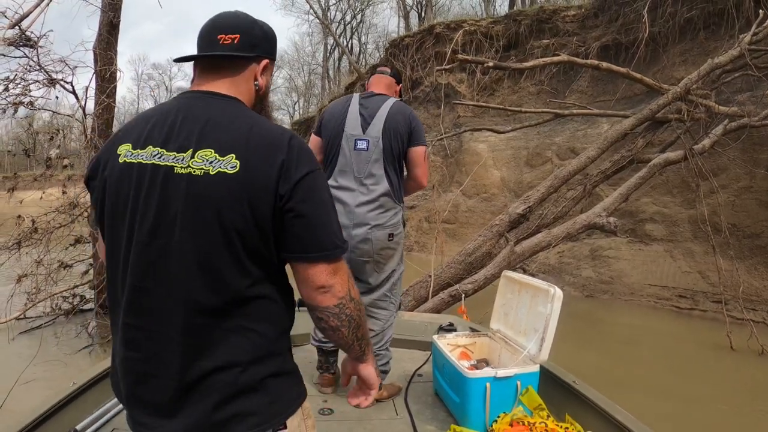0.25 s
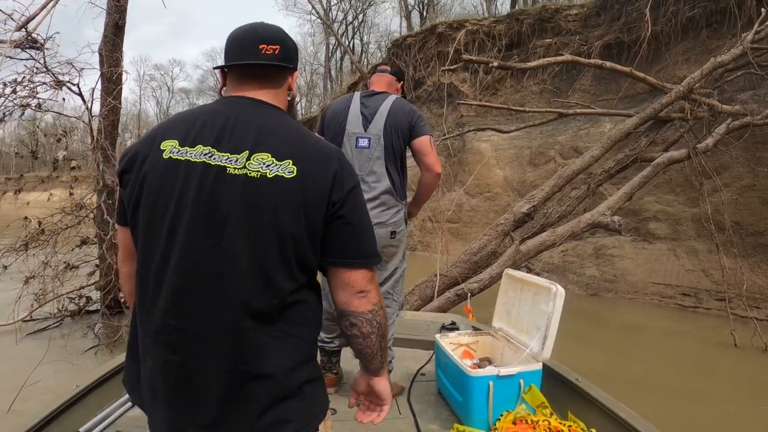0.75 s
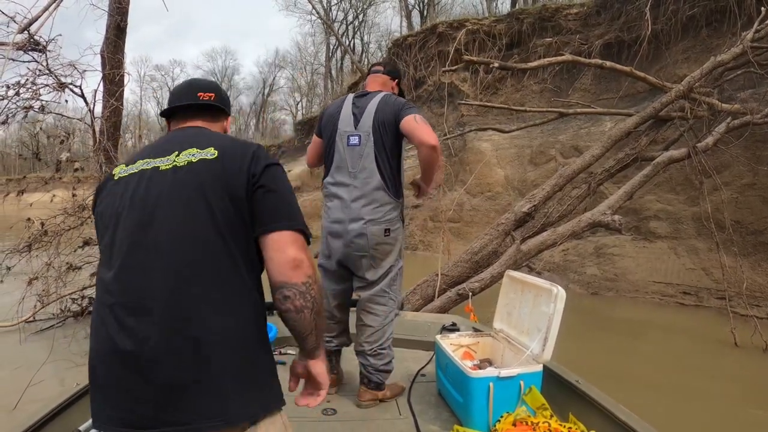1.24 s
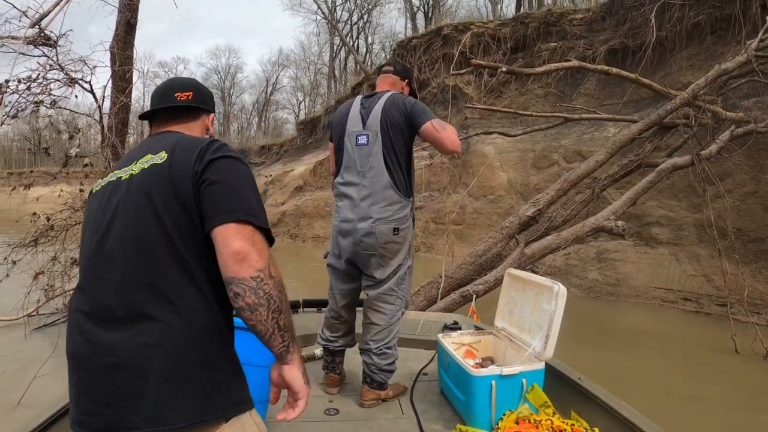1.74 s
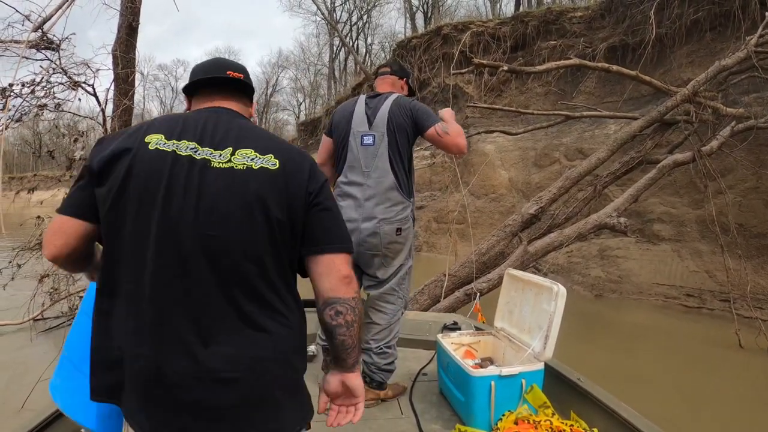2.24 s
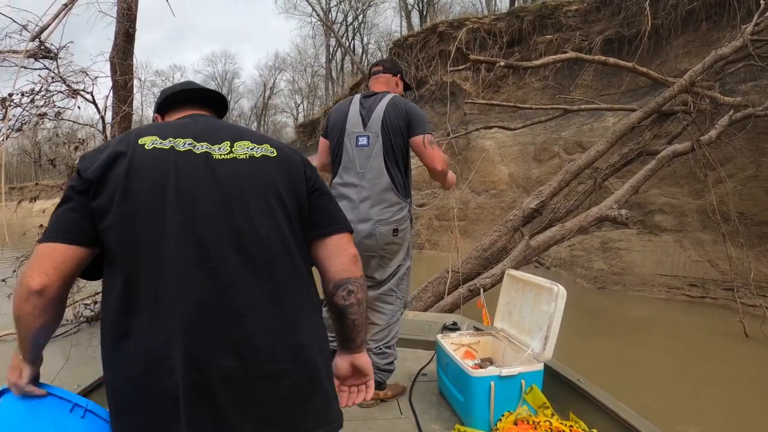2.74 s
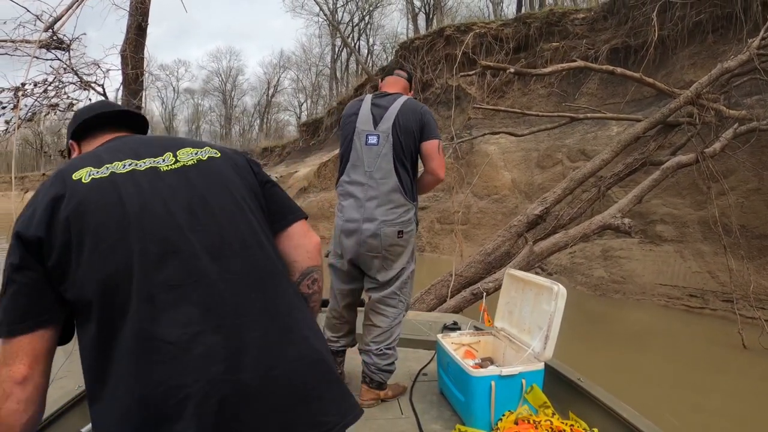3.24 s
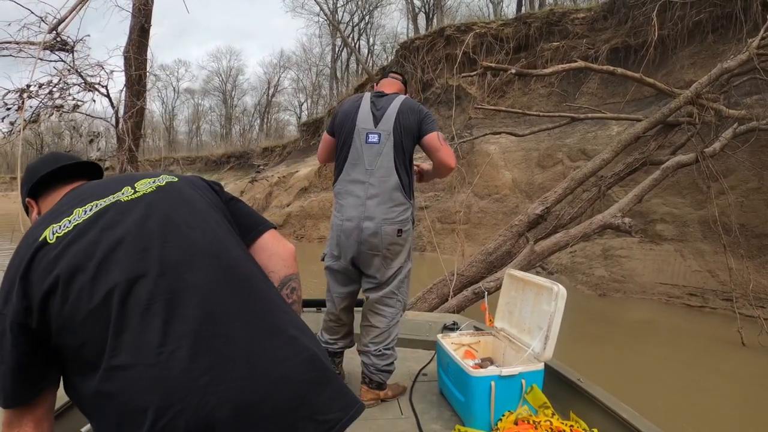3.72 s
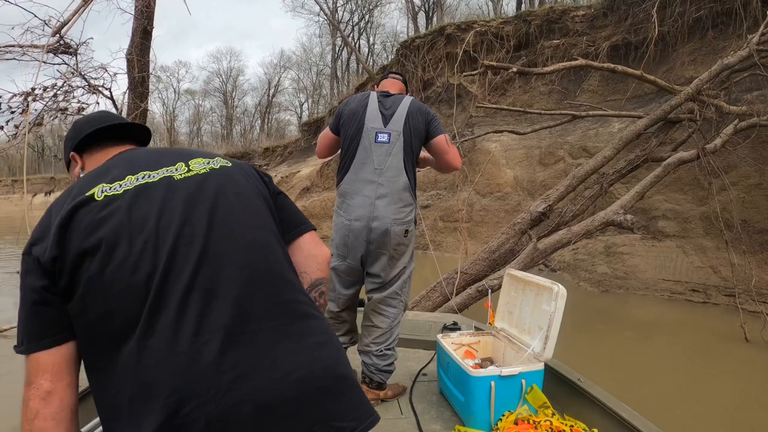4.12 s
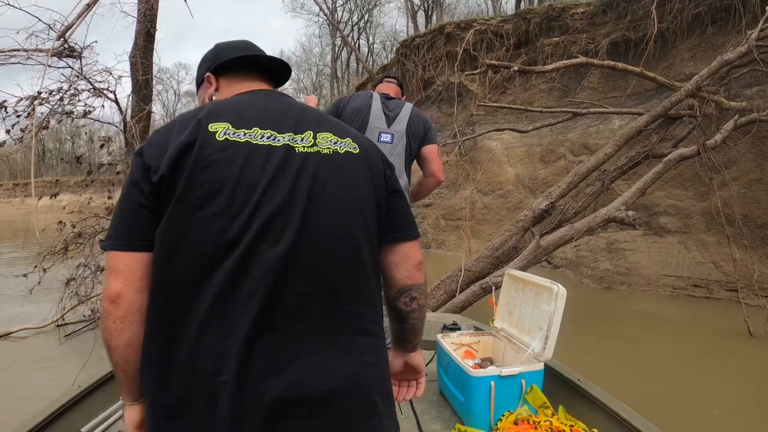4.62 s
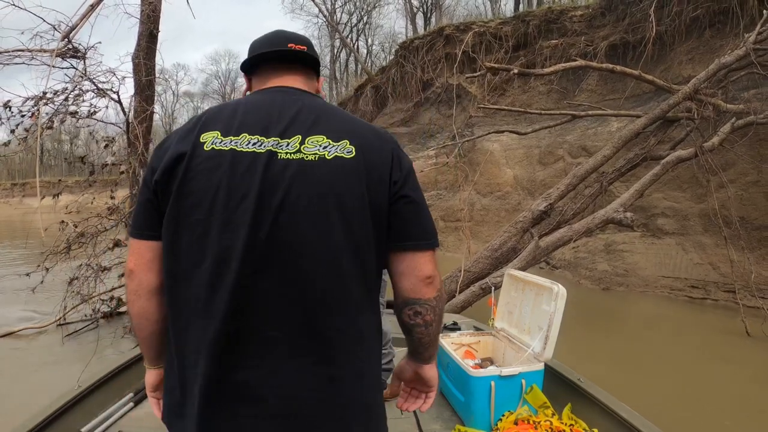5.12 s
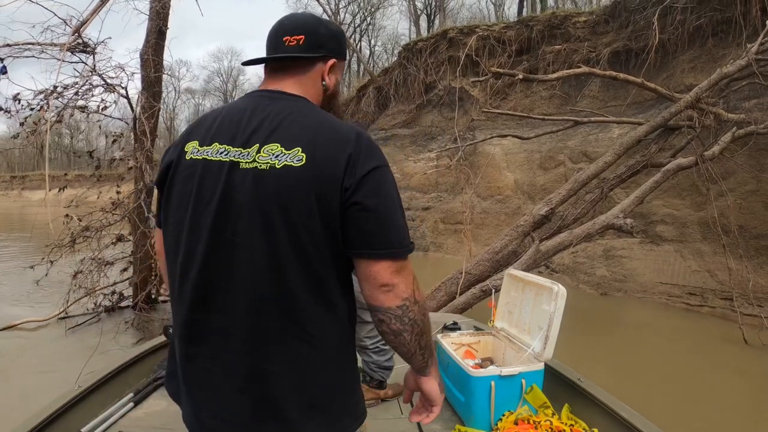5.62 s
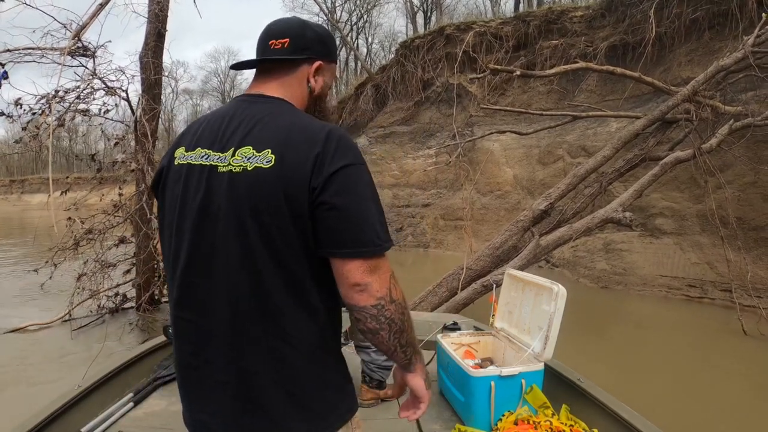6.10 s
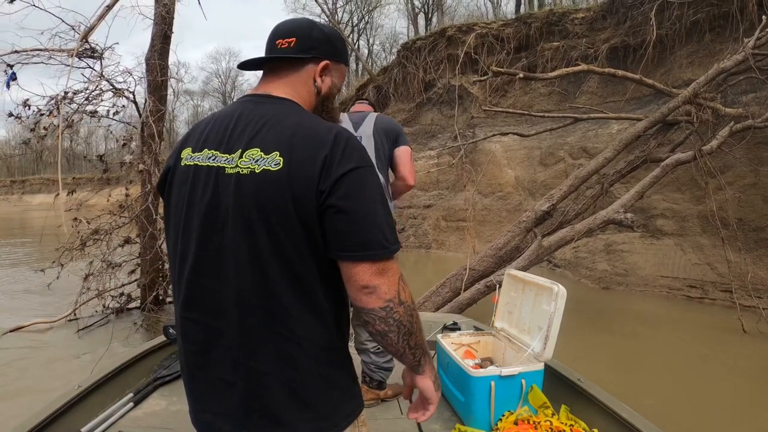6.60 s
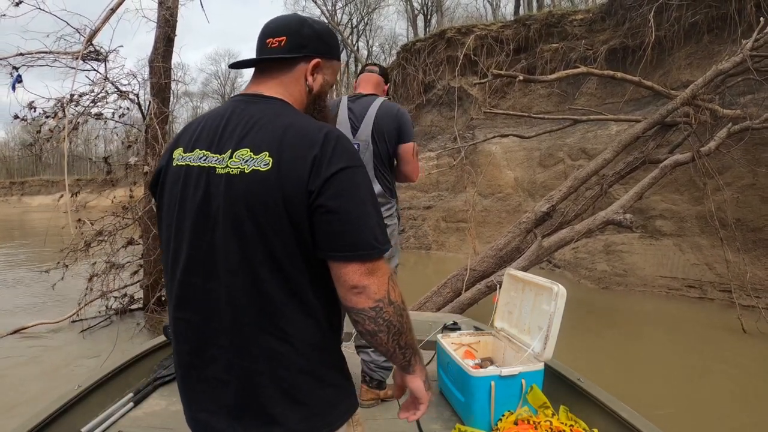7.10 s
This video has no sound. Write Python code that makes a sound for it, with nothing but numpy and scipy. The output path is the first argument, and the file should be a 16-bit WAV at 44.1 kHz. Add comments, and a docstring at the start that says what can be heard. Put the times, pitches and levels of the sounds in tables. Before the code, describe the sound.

Close, busy clattering and booming thumps on a small metal boat, with gritty dragging and one short rasp, then quiet lapping and soft rumble.

```python
"""Thuds and hard clacks: boots and an empty plastic drum on a small aluminium boat, close to the microphone.
Heavy contacts are decaying sines and noise for deck, hollow and hull; hard edges are short noise bursts
with a ring; dragging is patchy noise and humming hull modes, and the drum's rim rasps once.
Behind them lie low rumble, far rushing and hiss (coloured noise), lapping (rising sine blips), wind on
the microphone ports and, once all stands still, a faint rustle."""
import sys
import numpy as np
from scipy import signal
from scipy.fft import rfft, irfft, next_fast_len
from scipy.io import wavfile
from scipy.ndimage import uniform_filter1d, map_coordinates

SR = 44100
rng = np.random.default_rng(int(sys.argv[2]) if len(sys.argv) > 2 else 0)


def generate_wav(signal):
    """Clip the signal to [-1, 1] and save it as 16-bit WAV at the path in sys.argv[1]."""
    frames = np.transpose(np.atleast_2d(signal))
    scaled = np.clip(frames, -1, 1) * 32767
    pcm = np.round(scaled).astype(np.int16)
    wavfile.write(sys.argv[1], SR, pcm)


N = 324135

# hull modes: f/Hz, relative level/dB, free decay t60/s
HULL = [(160.43, 0.5, 0.25), (352, -13.5, 0.18), (416.7, -7, 0.12), (476.1, -9, 0.17), (566.2, -11, 0.15),
        (682.4, -16.5, 0.12), (778, -23.5, 0.21), (970, -15, 0.085)]
# left-right likeness of far sound: f/Hz, likeness
ALIKE_AIR = [(60, 1), (150, 1), (370, 0.94), (910, 0.62), (2240, 0.19), (5500, 0.42), (9000, .2),
             (13000, .4)]
# left-right likeness of sound close by: f/Hz, likeness
ALIKE_NEAR = [(60, 0.88), (150, 1), (370, 0.95), (910, 0.98), (2240, 0.97), (5500, 0.66), (9000, 0.1),
              (13000, 0.36)]


def amp(db):
    """dB to gain."""
    return 10 ** (np.asarray(db) / 20)


def unit(x):
    """Scaled to rms 1."""
    return x / np.sqrt(np.mean(x ** 2) + 1e-20)


def along(points, hz):
    """Values of (Hz, value) points, joined on a log frequency axis."""
    f, v = np.transpose(points)
    return np.interp(np.log(hz + 1), np.log(f + 1), v)


def bump(hz, centre, half_width, top_db):
    """A resonance hump in dB, half as high one half-width (Hz) off its centre."""
    return top_db / (1 + ((hz - centre) / half_width) ** 2)


def curves(rows):
    """One value per sample for each column after the time."""
    s, *cols = np.transpose(rows)
    return [np.interp(np.arange(N) / SR, s, c) for c in cols]


def wobble(rate):
    """A smooth random curve over the whole scene, rate knots a second."""
    knots = rng.standard_normal(int(N * rate / SR) + 4)
    return map_coordinates(knots, [np.arange(N) * rate / SR])


def jagged(t, rate):
    """Random knots joined by straight lines over the times t, rate knots a second."""
    knots = rng.standard_normal(int(t[-1] * rate) + 2)
    return np.interp(t * rate, np.arange(len(knots)), knots)


def filtered(x, response):
    """x passed through a complex response of frequency."""
    n = x.shape[-1]
    m = next_fast_len(n + 2048)
    return irfft(rfft(x, m) * response(np.fft.rfftfreq(m, 1 / SR)), m)[..., :n]


def stereo(pair, colour_db, alike):
    """Two unrelated noises turned into a coloured left-right pair of rms 1."""
    def mid_side(hz):
        angle = np.arccos(np.clip(along(alike, hz), -1, 1)) / 2
        return amp(colour_db(hz)) * [np.cos(angle), np.sin(angle)]

    mid, side = filtered(pair, mid_side)
    return unit(np.array([mid + side, mid - side]))


def patchy(patchy_db):
    """Two noises whose gain varies in shared random patches of time and frequency."""
    z = signal.stft(rng.standard_normal((2, N)), nperseg=512)[2]
    field = uniform_filter1d(rng.standard_normal(z.shape[1:]), 5, 0)
    field = uniform_filter1d(field, 10, 1)
    return signal.istft(z * amp(patchy_db * unit(field)), nperseg=512)[1][:, :N]


def place(out, start_s, sound):
    """Adds a short sound to out at its start time."""
    out[:, round(start_s * SR):][:, :sound.shape[-1]] += sound


def far_air():
    """Low rumble and the far band of rushing: noise with slightly wavering level."""
    # colour: f/Hz, relative density/dB
    air = [(24, -53), (40, -1.5), (77, -1), (173, -16), (197, -12.5), (243, -15), (305, -17), (339, -26),
           (474, -24.5), (549, -29), (800, -37.5), (1000, -29), (1300, -27), (1500, -29.5), (1700, -36),
           (2010, -36.5), (3000, -41.5), (3500, -48), (5990, -54.5), (7790, -83.5), (13200, -120)]
    calm = amp(.3 * wobble(1) + .4 * wobble(8)) * patchy(patchy_db=1.5)
    return amp(-36.5) * stereo(calm, lambda hz: along(air, hz), ALIKE_AIR)


def steady_hiss():
    """A very faint, steady treble noise."""
    # colour: f/Hz, relative density/dB
    hiss = [(4000, -18), (6000, -13.5), (8000, -14), (11000, -23), (13000, -27), (15500, -46.5)]
    return amp(-75.5) * stereo(rng.standard_normal((2, N)), lambda hz: along(hiss, hz), ALIKE_AIR)


def wind():
    """Wind lumps on the microphone ports: low noise that swells and sinks."""
    # buffeting: t/s, level/dB
    strength = [(0, -30.5), (1, -36.5), (2.05, -40), (2.5, -31), (3.4, -30), (3.9, -46), (5.1, -36.5),
                (6.1, -41.5), (6.3, -45.5), (7.35, -40.5)]
    # colour: f/Hz, relative density/dB
    gust = [(10, -39.5), (25, 10), (50, 8), (100, 5.5), (300, -13.5), (1000, -77)]
    buffet = stereo(rng.standard_normal((2, N)), lambda hz: along(gust, hz), [(30, .95)])
    return amp(curves(strength)[0] + 1.5 * wobble(7)) * buffet


def rustle():
    """Faint flickering noise once all stands still."""
    # rustle: t/s, mean level/dB
    stir = [(6.1, -74), (6.34, -75), (6.9, -60), (7, -71), (7.35, -83)]
    colour = [(1200, -29.0), (2500, -4.0), (5500, -15), (8000, -42.5)]  # f/Hz, relative density/dB
    stir_db = curves([(stir[0][0] - .1, -99), *stir])[0] + 3 * wobble(35)
    return amp(stir_db) * stereo(patchy(patchy_db=1.5), lambda hz: along(colour, hz), ALIKE_AIR)


def lapping():
    """Water laps at the hull: short bubbles with rising pitch, scattered left and right."""
    # single drips and gurgles: t/s, starting f/Hz, level/dB, cycles to the peak
    plips = [(5.073, 4300, -48, 2.5), (5.09, 1900, -48, 5), (5.215, 1320, -44, 7.3),
             (5.365, 2980, -49, 2.8), (5.47, 2420, -43, 3.3), (5.7, 3450, -49, 2.5),
             (5.732, 5000, -52, 2.5), (6.385, 4400, -51, 2.5), (5.53, 1470, -48, 11),
             (5.675, 1020, -44, 5.3), (5.77, 1390, -44, 6.3), (5.827, 2900, -44, 2.7), (5.87, 1750, -45, 9),
             (6.57, 840, -48, 3.5), (6.585, 1270, -44, 5), (6.74, 1260, -47, 14), (6.885, 940, -46, 6.3),
             (7.095, 604, -44, 2.2), (7.155, 633, -44, 2), (7.33, 850, -41.5, 4.4)]
    out, t = np.zeros((2, N + SR)), np.arange(SR // 16) / SR
    bubbles_per_s, median_hz, spread = 30, 1250, .18
    when, size, pitch = rng.random((round(bubbles_per_s * N / SR), 3)).T
    small_hz = median_hz * np.exp(spread * np.log(pitch / (1 - pitch)) / 2)
    small_db = -61 - 3 * np.log(size + .1)  # few are loud
    small = np.transpose([when * N / SR, small_hz, small_db, np.full(len(when), 5)])
    for s, hz, db, cycles in [*plips, *small]:
        turns, side = hz * t, rng.uniform(.25, .75)
        swell = turns / cycles * np.exp(1 - turns / cycles)
        plip = swell * np.sin(2 * np.pi * turns * (1 + .0015 * turns))
        place(out, s, amp(db) * np.sqrt([[2 * side], [2 - 2 * side]]) * plip)
    return out[:, :N]


def bank(x):
    """Answer of deck and river bank: a noise tail in which each frequency dies at its own speed."""
    # decay: f/Hz, t60/s
    decay = [(200, 0.098), (1500, 0.12), (8000, 0.058)]
    hz, t, z = signal.stft(rng.standard_normal((2, SR // 2)), SR, nperseg=256)
    fade = amp(-60 * t / along(decay, hz)[:, None])
    tail = signal.istft(z * fade, SR, nperseg=256)[1]
    return signal.fftconvolve(x, tail / np.linalg.norm(tail[0]), axes=1)[:, :N]


def hull_hum():
    """The shifting load drives the hull: uneven noise rings its damped modes."""
    # drive: t/s, hum level/dB
    roll = [(0, -24), (.18, -34.5), (.56, -40), (.85, -25.5), (1.25, -39.5), (1.5, -65), (1.76, -30),
            (1.92, -52), (2.32, -27.5), (2.8, -42), (3.15, -41.5), (3.53, -29), (3.85, -29.5),
            (4.05, -28.5), (4.45, -44.5)]
    # broad low modes that only a dragged load drives: f/Hz, relative level/dB, t60/s
    low_modes = [(72, 6.5, 0.078), (230, -1.5, 0.06), (309.2, 1, 0.094)]

    def hull(f):
        total = 0
        for k, (centre, db, t60) in enumerate([*low_modes, *HULL]):
            damping = 1j * f * (3 / t60)
            total = total + (-1) ** k * amp(db) * damping / (centre * centre - f * f + damping)
        return total / (1 + (f / 1200) ** 4)  # rubber and plastic push the plate only slowly

    push = amp(11.3 * np.tanh(wobble(24.85))) * rng.standard_normal(N)
    gain = amp(curves([*roll, (roll[-1][0] + .15, -99)])[0])
    return gain * unit(filtered(push, hull))


def drag():
    """Grit rubs and sizzles under a sliding load, cloth swishes and the hull hums."""
    # dragging: t/s, mean rub level/dB, mean swish level/dB
    slide = [(0, -37, -58), (.16, -55, -74), (.35, -51, -66.5), (.64, -48, -79), (.86, -54, -71),
             (1.02, -38.5, -73), (1.32, -65, -80), (1.63, -87, -84), (2.09, -45.5, -75.5),
             (2.37, -45.5, -67), (2.6, -59, -76), (2.77, -40, -67.5), (3, -58.5, -77), (3.2, -48.5, -69),
             (3.63, -44, -64), (4.14, -41, -69.5), (4.2, -58.5, -82.5), (4.55, -47.5, -66.5),
             (4.78, -42, -60), (5, -47.5, -69), (5.2, -63, -89), (5.59, -50, -77), (5.9, -60.5, -79)]
    # rub of grit: f/Hz, relative density/dB
    rub_colour = [(290, -12.5), (500, 2), (829, -4), (1030, -5), (1200, -2), (1550, -15), (1650, -6.5),
                  (4500, -18), (5850, -31), (9900, -120)]
    # sizzle of grit: f/Hz, relative density/dB
    sizzle_colour = [(2500, -13), (4000, -9.5), (5500, -5.5), (7000, -8), (9000, -40), (12000, -80.5)]
    # swish of cloth: f/Hz, relative density/dB
    swish_colour = [(5000, -23), (7500, -6.5), (10000, -12.5), (13000, -15), (15500, -49)]
    t = np.arange(N) / SR
    moving = np.clip((slide[-1][0] + 0.089 - t) / 0.053, 0, 1)  # everything comes to rest
    rub_gain, treble_gain = moving * amp(curves(slide) + 1.04 * wobble(9.4))  # the load slides in jerks
    grit = amp(wobble(40) + 2.5 * wobble(400)) * patchy(patchy_db=2)
    rub = stereo(grit, lambda hz: along(rub_colour, hz), ALIKE_NEAR)
    sizzle = stereo(grit, lambda hz: along(sizzle_colour, hz), ALIKE_NEAR)
    swish = stereo(patchy(patchy_db=0.5), lambda hz: along(swish_colour, hz), ALIKE_NEAR)
    treble = amp(6) * sizzle + swish  # sizzle 6 dB over the cloth
    return rub_gain * rub + treble_gain * treble + hull_hum()


def rasp():
    """The drum's rim judders once over the deck; its colour and its ring shift along the stroke."""
    # scrape at the start of the stroke: f/Hz, relative density/dB
    start_colour = [(290, -38), (500, -11), (940, -5), (1250, -8), (2300, -8.5), (6000, -23.5), (8000, -34),
                    (13000, -47), (15500, -77)]
    # scrape at its end: f/Hz, relative density/dB
    end_colour = [(290, -38), (500, -4), (1170, -9), (1550, -6), (2400, -8), (6000, -22), (8000, -37.5),
                  (13000, -39), (15500, -82)]
    # ring of the rim: t/s into the stroke, f/Hz
    ring_pitch = [(0, 940), (.04, 953), (.06, 1600), (.1, 1240)]
    start_s, lasts_s, rise_s, fall_s = 2.552, 0.08, 0.012, 0.06
    t = np.arange(SR // 4) / SR
    stroke = np.clip(np.minimum(t / rise_s, 1 + (lasts_s - t) / fall_s), 0, 1) ** 2
    done = np.clip(t / lasts_s, 0, 1)
    first = stereo(rng.standard_normal((2, len(t))), lambda hz: along(start_colour, hz), ALIKE_NEAR)
    last = stereo(rng.standard_normal((2, len(t))), lambda hz: along(end_colour, hz), ALIKE_NEAR)
    scrape = np.sqrt(1 - done) * first + np.sqrt(done) * last
    waver = unit(filtered(rng.standard_normal(len(t)), lambda hz: 1 / (1 + (hz / 130) ** 2)))
    turns = np.cumsum(np.interp(t, *np.transpose(ring_pitch))) / SR
    ring = np.sqrt(2) * waver * np.sin(2 * np.pi * turns)
    slips = amp(2.5 * jagged(t, rate=300))  # stick-slip grain
    level = amp(-33.5 + 4.5 * done)  # swells along the stroke
    out = np.zeros((2, N))
    place(out, start_s, stroke * slips * level * (scrape + amp(-3.5) * ring))
    return out


def edge_noise(n, edge_hz, sizzle_db):
    """Grit under a hard edge: noise standing out at the edge's pitch and at ribs that ring through it."""
    # colour of a clack: f/Hz, relative density/dB
    edge_colour = [(1000, -16.5), (1700, 4.5), (2800, 2.5), (4800, 0.5), (7000, -11.5), (10000, -20.5),
                   (13000, -31.5), (15500, -47)]
    # ribs: mean f/Hz, half-width/Hz
    ribs = [(1250, 70), (1720, 90), (2250, 100), (2650, 110), (3290, 130), (3900, 150), (4500, 170),
            (5200, 190), (6200, 220)]
    scatter = rng.uniform([-1, 0], 1, (len(ribs), 2))

    def colour_db(hz):
        db = along(edge_colour, hz) + along([(4500, 0.005), (6000, sizzle_db)], hz)
        db = db + bump(hz, edge_hz, 0.2 * edge_hz, 6.1)
        # a small, high edge radiates little far below its pitch
        db = db + along([(.3 * edge_hz, -9), (.55 * edge_hz, 0)], hz)
        for (centre, width), (shift, share) in zip(ribs, scatter):
            db = db + bump(hz, centre * (1 + .03 * shift), width, 9 * share)  # a rib adds at most 9 dB
        return db

    return stereo(rng.standard_normal((2, n)), colour_db, ALIKE_NEAR)


def plate_knock(t, knock_hz, sharpness):
    """The plate under the edge: dull noise around its pitch; a sharp blow rings the panel clearly."""
    # colour of the knock: f/Hz, relative density/dB
    knock_colour = [(150, -35.5), (350, -2), (900, -1.5), (1500, -3.5), (2500, -44.5), (5000, -74.5)]
    colour_db = lambda hz: along(knock_colour, hz) + bump(hz, knock_hz, 0.2 * knock_hz, 6.2)
    dull = stereo(rng.standard_normal((2, len(t))), colour_db, ALIKE_NEAR)
    return dull + amp(-2) * sharpness * np.sin(2 * np.pi * knock_hz * t)


def clacks():
    """A crack of grit with a short ring of the edge, over a duller, longer knock of the plate."""
    # hard edges; a quick rise clacks, a slow one scuffs: t/s, level/dB, knock re usual/dB, knock f/Hz,
    # sizzle re the usual treble/dB, crack t60/s, rise/s, edge f/Hz
    edges = [(.004, -34, 9.5, 666, -9, 0.053, 0.004, 2230),
             (0.0691, -25, -3, 670, -11, 0.04, 0.00088, 2240),
             (0.096, -25.5, -8, 650, 2.5, 0.11, 0.0026, 2490), (.118, -31, 1, 885, -6, 0.04, .003, 2220),
             (0.1425, -20, -4.5, 1000, -34, 0.044, 0.002, 2230),
             (.196, -37, -16, 616, 6, 0.59, 0.0051, 4270), (0.237, -30, -8, 634, -6, 0.067, 0.0023, 3750),
             (0.2674, -23, -10, 1027, 0.5, 0.1, 0.0015, 2560),
             (0.3027, -27.5, -11, 587, 4, 0.15, 0.0024, 2290),
             (0.344, -28.5, -12, 633, -32, 0.072, 0.00044, 1770),
             (0.4341, -32.5, -11, 1340, -6, 0.12, 0.002, 2080),
             (0.541, -29, -3, 746, -4, 0.083, 0.00031, 4350),
             (0.6553, -38.5, -2.5, 990, -5, 0.38, 0.00066, 2010),
             (.6799, -33, -3, 608, 1, 0.25, 0.00063, 1760), (0.71, -18.5, -10, 638, 3, 0.11, 0.0078, 3130),
             (.752, -42, -22, 595, -18, .056, .0007, 2460),
             (0.781, -30.5, -24, 1060, 7, 0.13, 0.0035, 2980),
             (0.817, -13.5, -2.5, 916, -4.5, 0.072, 0.00074, 2400),
             (.873, -36.5, -20, 900, -7, 0.061, .006, 4260),
             (.9234, -19, -8, 596, 6.5, 0.061, 0.00063, 3670),
             (0.9625, -26.5, -11, 623, 3, 0.078, 0.0013, 3820),
             (.982, -37, -17, 910, 12, 0.044, .003, 4870),
             (.9976, -13.5, 3.5, 401, -6, 0.074, 0.00099, 2100),
             (1.068, -27, -4, 697, 1, 0.089, 0.007, 4130),
             (1.1491, -33.5, 9, 574, -26, 0.053, 0.0004, 1760),
             (1.1863, -23.5, -5.5, 666, -3, 0.054, 0.016, 2700),
             (1.275, -28, -21, 704, 1.5, 0.05, 0.0013, 5420), (1.315, -37, 4, 604, -1, 0.23, 0.0027, 5130),
             (1.3503, -31, -7, 603, 7, 0.088, 0.0021, 4100),
             (1.4845, -29.5, -4.5, 986, -1, 0.048, 0.0005, 4160),
             (1.596, -27.5, 8.5, 420, -9, 0.085, 0.00049, 1910),
             (1.6544, -28, -17, 896, -4.5, 0.058, 0.00055, 2590),
             (1.696, -43.5, -13, 900, -6, 0.091, .001, 3670),
             (1.7722, -29.5, 8.5, 1061, -0.5, 0.066, 0.00035, 2120),
             (1.815, -42, -6, 900, 0, 0.039, .001, 3600),
             (1.8257, -36.5, 9.5, 960, -20, 0.083, 0.00062, 2010),
             (1.9, -32.5, -19, 1030, 2, 0.037, 0.00049, 4100),
             (1.931, -39, -24, 900, -1, 0.044, .001, 4090), (1.979, -47, -22, 903, 2, 0.076, 0.0028, 5200),
             (2.0866, -32.5, -26, 990, 2, 0.054, 0.0023, 2070),
             (2.1133, -26.5, -26, 1020, 0, 0.082, 0.0013, 4170),
             (2.1596, -29, 1.5, 1224, -6, 0.038, .0012, 4660),
             (2.203, -23, -3, 720, -5, 0.054, 0.026, 1910),
             (2.2689, -25.5, -8.5, 1140, -1, 0.16, .0007, 1910),
             (2.2819, -15, -29, 605, 2, 0.061, 0.0072, 2490),
             (2.37, -25.5, 4.5, 1108, 2.5, 0.093, 0.00031, 1586),
             (2.414, -35, 4, 603, 3, 0.082, 0.0045, 1670), (2.466, -32, -1, 904, 3, 0.077, 0.00069, 1960),
             (2.6561, -34.5, 12.5, 660, -8, 0.056, .0006, 2660),
             (2.707, -19.5, -4, 710, -1, 0.13, 0.0046, 4050),
             (2.732, -28, -10, 900, -15, 0.029, 0.0013, 2170),
             (2.8146, -32.5, 3, 600, 4, 0.057, 0.0032, 2600),
             (2.9033, -36.5, 3.5, 890, -28, 0.07, .0008, 1840),
             (2.928, -32, 2.5, 1284, -1, 0.046, 0.00055, 4700),
             (3.108, -41.5, 10, 880, 3, 0.12, 0.0057, 3850), (3.1346, -29, 2, 1006, 0, 0.19, 0.0096, 1700),
             (3.1626, -19, -5.5, 757, 0.5, 0.056, 0.0069, 3960),
             (3.2328, -38, -13, 1130, 4, 0.18, 0.00077, 1670),
             (3.27, -37, -21, 605, 23, 0.035, 0.00086, 3170),
             (3.2995, -33.5, 10.5, 1010, -32, 0.05, 0.00052, 2030),
             (3.325, -32.5, 0, 910, -15, .08, 0.0078, 2550),
             (3.4024, -36, 6.5, 605, -10, 0.15, .0008, 1740), (3.4294, -28, 0, 624, 3, 0.074, 0.0044, 2310),
             (3.466, -35, -16, 910, 0, 0.11, 0.0059, 3600), (3.494, -17.5, 2, 560, -7, 0.065, 0.0003, 2190),
             (3.5394, -31.5, 17, 624, -18, 0.061, 0.0022, 2230),
             (3.61, -41.5, 17, 710, -18, 0.16, 0.013, 1710),
             (3.6549, -27.5, 7.5, 663, -1.5, 0.33, 0.00087, 2440),
             (3.679, -14, -0.5, 590, -4.5, 0.063, 0.00047, 1970),
             (3.716, -46, 11, 650, -25, 0.021, .001, 1700), (3.77, -21.5, 7, 735, -32, 0.064, 0.006, 2210),
             (3.788, -39.5, 15, 904, -25, 0.23, 0.0035, 1710),
             (3.875, -37.5, 12, 810, -22, 0.21, .02, 1700),
             (3.921, -28, 5.5, 445, -18, 0.034, 0.0013, 1940),
             (4.087, -25.5, 4.5, 870, 2, 0.081, 0.021, 2680),
             (4.187, -38.5, 20.5, 1054, -30, 0.045, 0.00028, 1260),
             (4.494, -28.5, 4, 744, 7, 0.042, 0.0038, 2900), (4.502, -25, 4.5, 765, -8, 0.057, 0.0087, 740),
             (4.609, -38, 8, 618, -20, 0.12, 0.0082, 2140), (4.75, -34, 1, 1290, -10, 0.13, 0.0064, 1970),
             (4.7755, -22, 12.5, 1650, -30, 0.018, 0.0015, 1180),
             (4.791, -30, 1, 1310, -8, 0.046, 0.0024, 1600), (4.842, -32, 10, 970, -12, 0.019, 0.001, 3640),
             (5.5579, -27.5, -6, 980, -1.5, 0.1, 0.00031, 2230),
             (5.591, -32.5, -4, 950, -2, 0.063, 0.0037, 2690),
             (5.628, -36.5, -2, 986, -10, 0.053, 0.0011, 2500),
             (5.933, -17.5, 3.5, 590, -9, 0.071, 0.00032, 2350),
             (5.9538, -31, 3, 1015, -3, 0.17, 0.00058, 1730)]
    # the gear is carried to the left: t/s, left re right/dB
    leftward = [(0, 0), (2, 0.5), (3.5, 1), (4.7, 1), (5.9, 0.5)]
    out, t = np.zeros((2, N + SR)), np.arange(SR // 6) / SR
    for s, db, knock_db, knock_hz, sizzle_db, t60, rise, edge_hz in edges:
        t60 = max(t60, .01)
        # the gain makes up for decay during a slow rise
        start = amp(40 * rise / t60) * (1 - np.exp(-(t / max(rise, 1e-4)) ** 2))
        # a slow rise leaves the plate damped, so the knock dies with the scuff
        sharpness = np.exp(-rise / 0.017)
        # sharp first contact, then rattle
        crack = (amp(-60 * t / t60) + 0.2 * amp(-60 * t / 0.0033)) * edge_noise(len(t), edge_hz, sizzle_db)
        ring = amp(-12 - 60 * t / min(0.045, 2.7 * t60)) * np.sin(2 * np.pi * edge_hz * t)
        knock_gain = amp(-8.5 + knock_db - 60 * t / ((1 + 1.21 * sharpness) * t60))
        knock = knock_gain * plate_knock(t, knock_hz, sharpness)
        rattle = amp(1.5 * jagged(t, rate=222.5))
        place(out, s, amp(db) * start * rattle * (amp(-5.5) * crack + ring + knock))
    return out[:, :N] * amp(curves(leftward)[0] * np.array([[.5], [-.5]]))


def deck_boom(t, level_db, hz):
    """The deck flexes under the weight and keeps swinging faintly afterwards."""
    swell_s = 0.013  # time the deck takes to flex fully
    flex = (t / swell_s * np.exp(1 - t / swell_s)) ** 1.5
    tail = amp(-14.5 - 60 * t) * (1 - np.exp(-t / swell_s))
    return amp(level_db) * (flex + tail) * np.sin(2 * np.pi * hz * t)


def hull_ring(t, low_db, high_db, share):
    """The hull modes ring at new strengths and pitches; upper modes come in beating pairs."""
    hz, level_db, t60 = np.transpose([HULL[0]] + 2 * list(HULL[1:]))[:, :, None]
    upper = hz > 190
    size, pitch, phase = rng.standard_normal((3, len(hz), 1))
    detuned_hz = hz * (1 + np.where(upper, .015, .008) * pitch)
    swing = np.sin(2 * np.pi * detuned_hz * t + 2 * upper * phase)
    mode_db = np.where(upper, high_db, low_db) + level_db + 2 * size
    return (amp(mode_db - 60 * t / (t60 * share)) * swing).sum(0)


def thumps():
    """Each heavy contact flexes the deck, thuds in a hollow and rings the hull and its dense modes."""
    # heavy contacts: t/s, deck boom level/dB, boom f/Hz, lowest mode level/dB, hollow thud level/dB,
    # thud f/Hz, upper modes level/dB, ring length/free decay times
    contacts = [(.002, -21, 49, -30, -20, 221, -26, 0.76), (.149, -31, 55, -25.5, -28, 207, -27.5, 1.7),
                (0.27, -31.5, 95, -29.5, -28.5, 190, -37, 2.1),
                (0.347, -31, 76.6, -45, -24, 287.6, -25.5, 1.2),
                (.681, -10, 87.7, -13, -13.5, 202, -23.5, 1.4),
                (.817, -10.5, 87.2, -15.5, -13, 221, -17.5, 0.97),
                (0.859, -15, 98.5, -26, -28, 262, -34, 0.86), (0.926, -10.5, 73.5, -24, -40, 230, -36, 1),
                (1.002, -7, 88.7, -20.5, -18.5, 231, -13.5, 1.4),
                (1.074, -8.5, 73.2, -24.5, -37, 232, -24.5, 1.9),
                (1.152, -10.5, 74.6, -33, -23, 235, -26.5, 1.67),
                (1.208, -28, 86.4, -41, -23, 230, -30, 0.78),
                (1.315, -14.5, 75.7, -19, -25, 212.6, -28, 1.62),
                (1.598, -13, 82.9, -21.5, -28, 263.5, -24.5, 2.16),
                (1.669, -21, 95, -34, -37, 267, -34, 0.99), (1.772, -13, 83.7, -21, -25, 282, -22.5, 1.7),
                (1.827, -21.5, 115, -19, -22.5, 195, -27, 0.66),
                (1.848, -17, 87.5, -32, -28, 220, -37, 1.1), (2.13, -11.5, 78, -36, -54, 219, -38, 8.8),
                (2.29, -14, 67, -23.5, -34, 278, -24, 2.5), (2.365, -16, 94, -30.5, -42, 238, -22, 1.46),
                (2.469, -20, 81.4, -23, -42, 240, -26.5, 1.3),
                (2.655, -12.5, 84.6, -22, -25, 250, -24, 3.1),
                (2.719, -11, 70.5, -19, -26.5, 280, -24.5, 1.8),
                (2.788, -13.5, 76, -21, -21, 196, -30, 1.1), (2.83, -15, 63, -15, -22, 227, -33, 0.89),
                (2.898, -15, 79.5, -29.5, -41, 242.4, -36, 2.4),
                (3.059, -24.5, 70, -33, -30.5, 230.5, -35, 3.3),
                (3.173, -16.5, 72.8, -26, -47, 320, -36.5, 1.8),
                (3.298, -16.5, 98.4, -31, -16, 255, -21.5, 1.24),
                (3.314, -22, 91.4, -9, -38, 256, -31, 1.27),
                (3.404, -21, 105, -10.5, -21, 195, -27.5, 0.76),
                (3.494, -15.5, 85.7, -38, -34, 232, -33, 1.8), (3.541, -23, 88, -17, -18.5, 194, -28, 0.47),
                (3.576, -19, 67.3, -27.5, -45, 250, -47, 1.5), (3.654, -21, 97, -19, -19, 245, -24, 0.71),
                (3.68, -20.5, 106, -24.5, -25, 287.7, -20, 1.83),
                (3.768, -40, 107.5, -48, -30, 294.6, -24.5, 1.9),
                (3.921, -29, 106, -21, -29, 248, -16, 0.79),
                (3.931, -35, 100.4, -31, -10.5, 256, -30, 0.66), (4.153, -27, 85, -40, -48, 250, -49, 1),
                (4.187, -16, 89.4, -17, -10.5, 254.5, -12.5, 0.8),
                (4.197, -16, 103, -13.5, -5.5, 252.3, -16, 0.77),
                (4.23, -15.5, 92.7, -14.5, -19, 221, -20, 0.92),
                (4.609, -42, 71.4, -36, -37, 258, -35, 1.3),
                (4.778, -21.5, 78.5, -17.5, -9.5, 270, -29, 0.36),
                (5.93, -11, 84.9, -15.5, -10, 236, -12.5, 1.14),
                (5.956, -13.5, 77.4, -7, -13.5, 212.2, -13, 1.23),
                (5.997, -21.5, 113.8, -14, -19.5, 293.4, -31, 1.1)]
    # dense high modes: f/Hz, relative density/dB
    plate = [(200, -1.5), (350, 12), (700, -2), (1200, -18), (2500, -21.5), (5000, -37.5), (8000, -56.5),
             (12000, -90.5)]
    out, t = np.zeros((2, N + SR)), np.arange(SR // 3) / SR
    for s, boom_db, boom_hz, low_db, thud_db, thud_hz, high_db, share in contacts:
        share = max(share, .1)  # a boot resting on the plate damps it
        thud_gain = amp(thud_db - 60 * t / (0.19 * share)) * (1 - np.exp(-(t / 0.004) ** 2))
        thud = thud_gain * np.sin(2 * np.pi * thud_hz * t)
        dense = stereo(rng.standard_normal((2, len(t))), lambda hz: along(plate, hz), ALIKE_NEAR)
        wash = amp(high_db - 7 - 60 * t / (.2 * share)) * dense
        onset = 1 - np.exp(-t / 0.0014)
        struck = onset * (thud + hull_ring(t, low_db, high_db, share) + wash)
        place(out, s, deck_boom(t, boom_db, boom_hz) + struck)
    return out[:, :N]


def scene():
    """All sources on two channels, from the far surroundings to the contacts on the deck."""
    background = far_air() + steady_hiss() + wind() + rustle() + lapping()
    heavy, hard = thumps(), clacks() + rasp()
    answer = bank(amp(-26.5) * heavy + amp(-10.0) * hard)
    return background + answer + drag() + hard + heavy


def record(dry):
    """Two microphone ports: the left hears low sounds slightly later; the extreme treble is cut."""
    # treble loss of the capsules: f/Hz, gain/dB
    capsule = [(10000, -0.5), (13000, -5.5), (15000, -19.5)]
    lag_s, top_hz = 1.5 / SR, 15100

    def ports(hz):
        # half the lag on each side; the phase stays constant above 4 kHz
        phase = np.pi * np.minimum(hz, 4000) * lag_s * np.array([[1], [-1]])
        return amp([[.2], [-.2]]) * np.exp(-1j * phase)

    dry = dry / (1 + np.abs(dry / .75) ** 4) ** .25  # loud peaks round off in the input stage
    return filtered(dry, lambda hz: ports(hz) * amp(along(capsule, hz)) * (hz < top_hz))


dry = scene()
out = record(dry)
generate_wav(out)
```